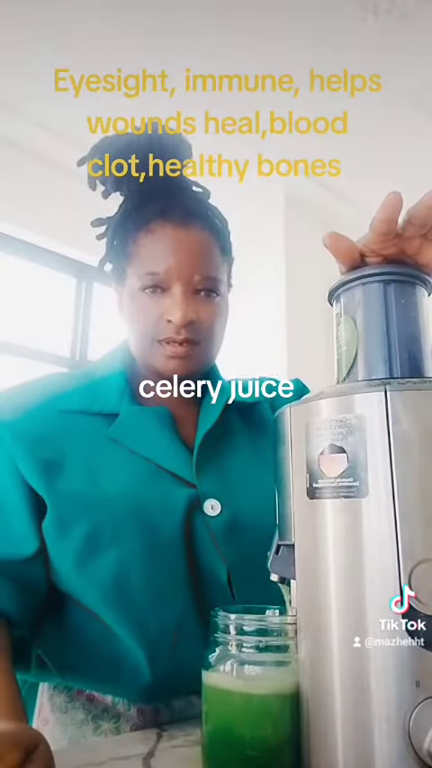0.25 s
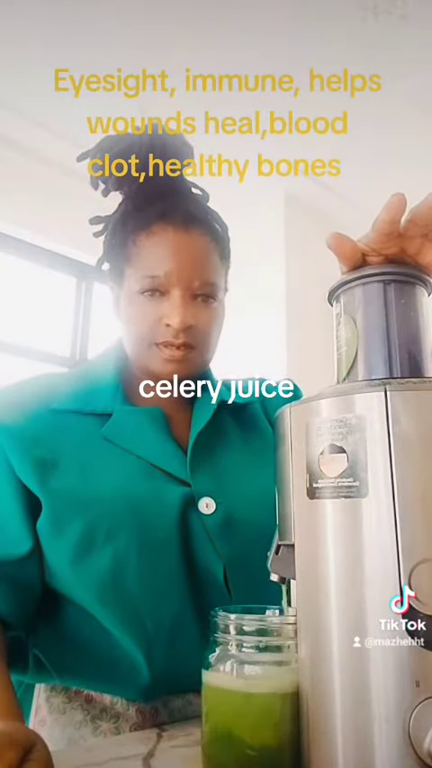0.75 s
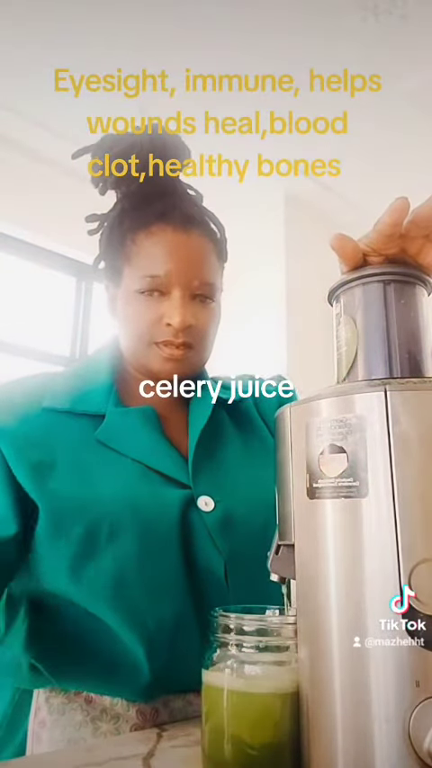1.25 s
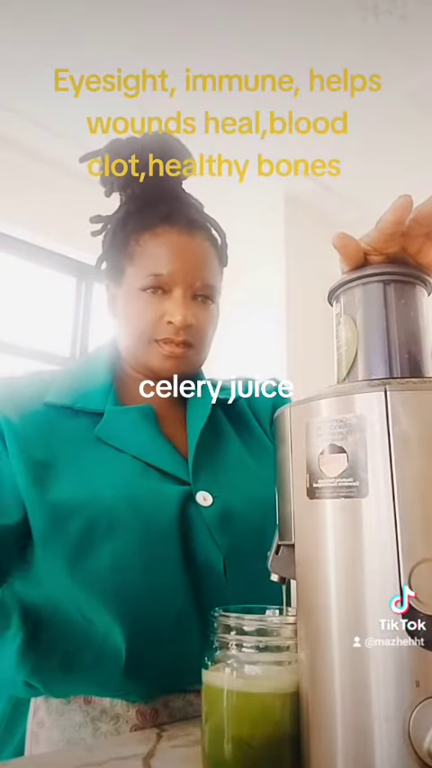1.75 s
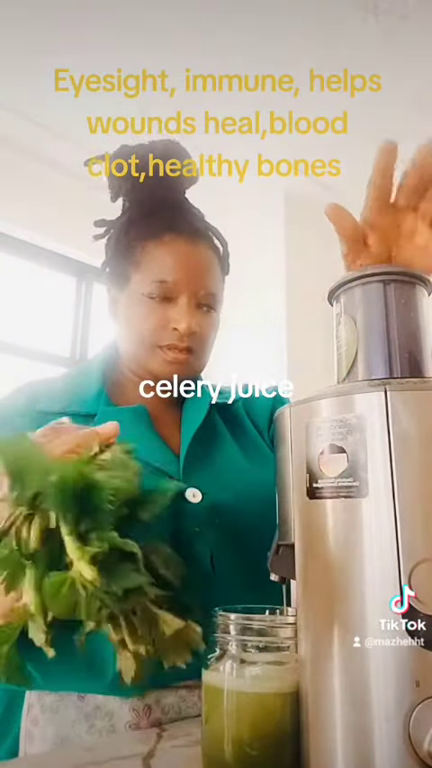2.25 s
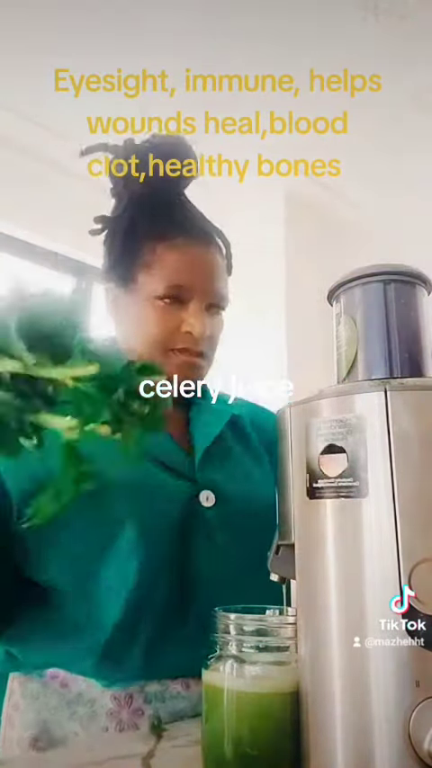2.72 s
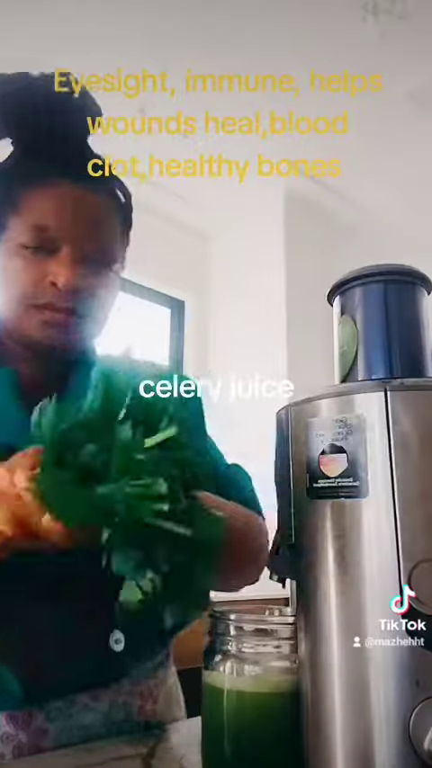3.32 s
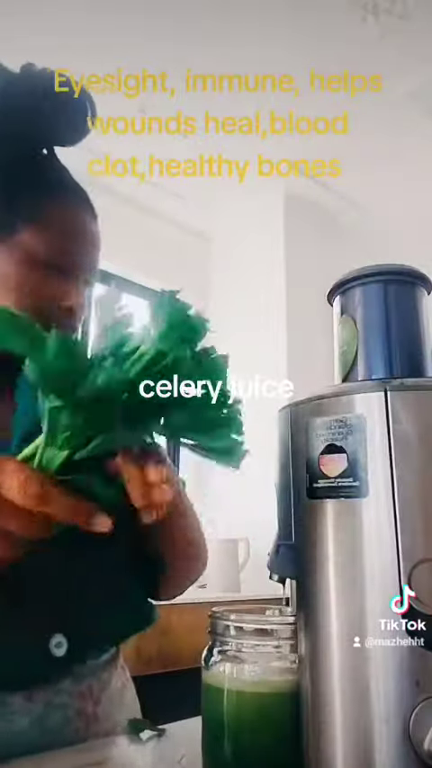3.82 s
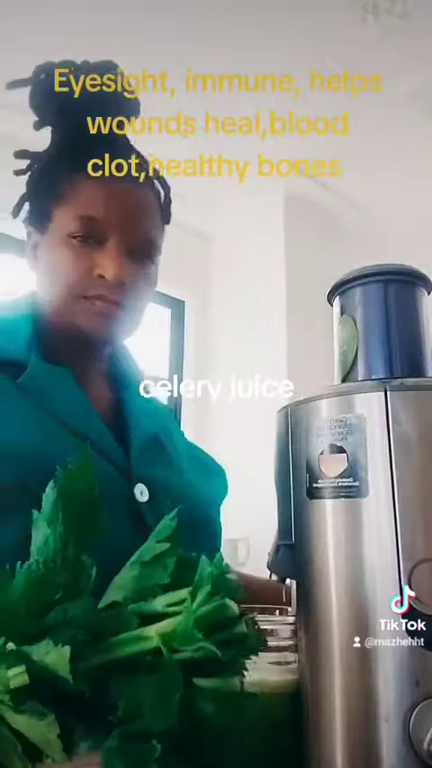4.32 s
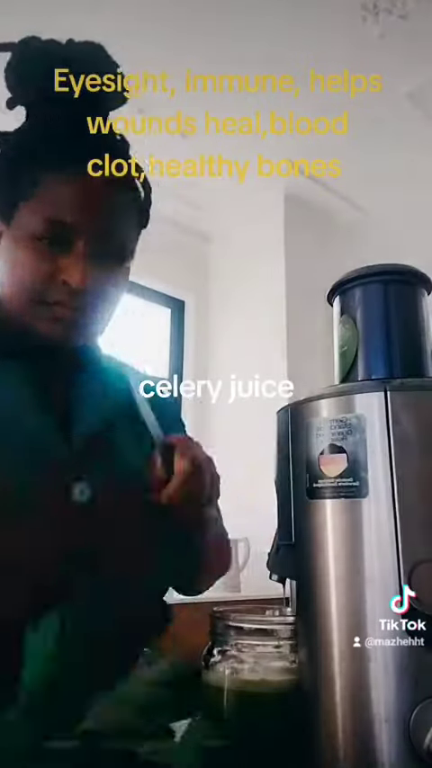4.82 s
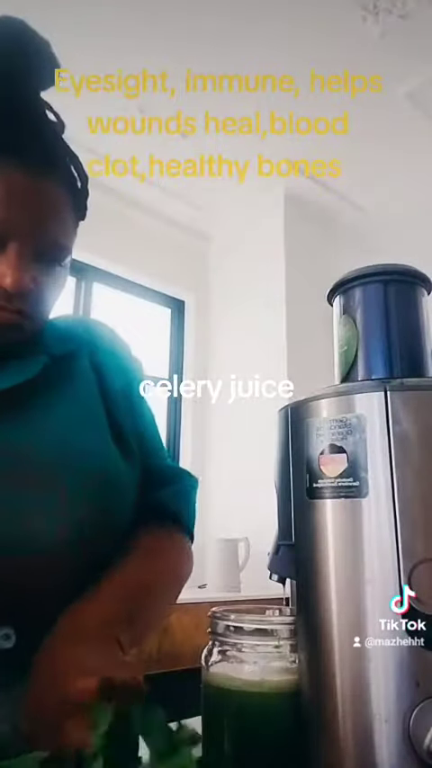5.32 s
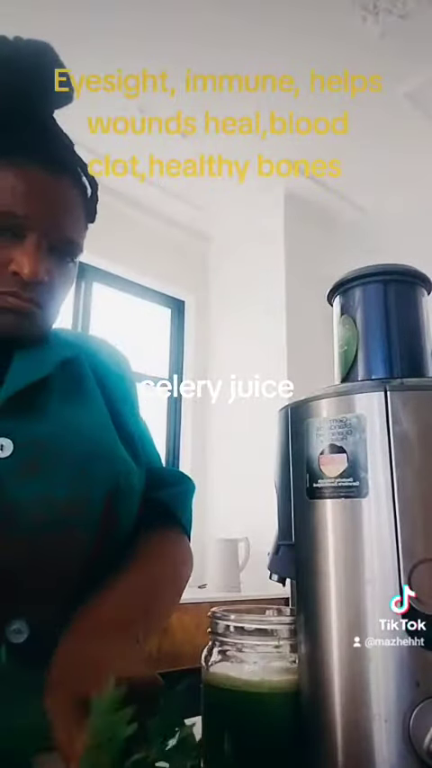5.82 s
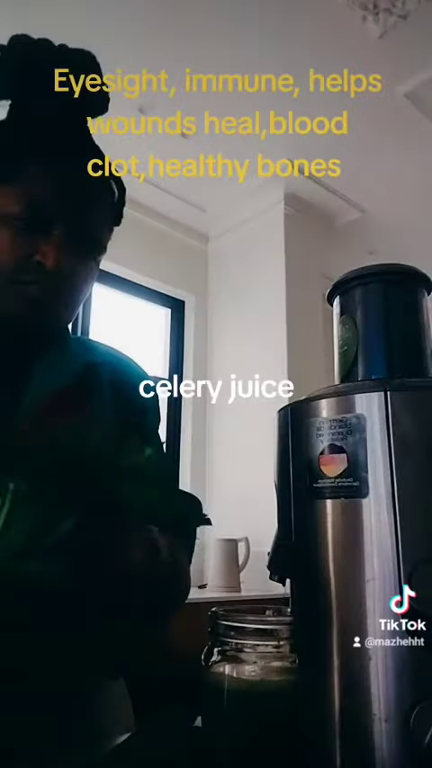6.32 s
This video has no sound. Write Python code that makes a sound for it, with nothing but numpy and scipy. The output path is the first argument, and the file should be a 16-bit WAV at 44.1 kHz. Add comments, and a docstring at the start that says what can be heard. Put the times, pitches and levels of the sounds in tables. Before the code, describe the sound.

A juicer motor drones under load, eases slightly as it runs free, and celery stalks are cut with two crisp crunches.

```python
"""A slow juicer hums in a kitchen: its motor labours on celery, then speeds up a little as the load falls.
Rotor unbalance, mains hum in the iron and meshing gear teeth give steady partials over a whirr of air
and bearings. The pusher chatters once a turn under the hand and bumps as it is let go.
Beside it a leafy bunch rustles, and a knife crunches twice through the stalks by brittle fracture
and knocks on the counter."""
import sys
import numpy as np
from scipy import signal
from scipy.fft import rfft, irfft, next_fast_len
from scipy.io import wavfile
from scipy.ndimage import map_coordinates

SR = 44100
rng = np.random.default_rng(int(sys.argv[2]) if len(sys.argv) > 2 else 0)


def materialize(psi):
    """Save the field psi as 16-bit PCM at rate SR to the path in sys.argv[1].

    A 1-D psi becomes a single channel; in a 2-D psi each row is a channel.
    """
    bounded = np.clip(np.atleast_2d(psi).T, -1, 1)
    quanta = np.round(bounded * 32767).astype(np.int16)
    wavfile.write(sys.argv[1], SR, quanta)


N = 288855
TIME = np.arange(N) / SR
FREE_TURNS_PER_S = 120.93


def juicer():
    """Rotating machinery: one shaft angle times the partials, and the load sets their speed and balance."""
    # the celery runs out: time_s, load (1 pressing, 0 running free)
    load_curve = [(0, 0.96), (1, 0.91), (1.6, 0.82), (2.27, 0.78), (2.32, 0.46), (2.75, 0.39), (2.95, .13),
                  (4.5, 0), (6.55, 0.051)]
    # rotor harmonics from the third up: loaded_db, free_db, loaded_pan_db, free_pan_db
    rotor_levels = [(-51.0, -59.5, 1, -3), (-51, -56.0, 0, -3.0), (-48.0, -58.5, -3.0, 4),
                    (-69.5, -60.5, -3.0, 0), (-60.5, -68.5, 0, 0), (-51.0, -70.5, -0.0, -2),
                    (-66, -69.5, 7, 9), (-59.5, -53.0, -1.5, 11), (-71.5, -79, 6, 0),
                    (-68.0, -60.5, 3, 1.5), (-59, -60.5, 8, 12), (-47.0, -69, 7.0, 13), (-59, -57, 6, 12),
                    (-60.5, -54.5, 6.0, 16.0), (-68, -76, 0, 5.0), (-70, -64.5, 4.0, 7), (-67, -74, 6, 6.0),
                    (-60, -66, 6, 18), (-62, -68, 11, 17)]
    # gear mesh (2.6 a turn), overtones, sidebands: order, loaded_db, free_db, loaded_pan_db, free_pan_db
    gear_partials = [(2.6, -49.0, -61.0, 1.0, -0.0), (2.8, -62.0, -60.0, -3.0, -2.0),
                     (3.6, -73.0, -64.0, -4.0, -3.0), (3.8, -77.0, -65.0, -4.0, -5.0),
                     (4.4, -67.0, -64.0, -2.0, -3.0), (5.2, -56.0, -55.0, 4.0, -2.0),
                     (5.4, -56.0, -65.0, 2.0, 6.0), (8.8, -63.0, -73.0, 2.0, 5.0),
                     (9.4, -69.0, -71.0, 1.0, 1.0), (10.4, -60.0, -66.0, 4.0, 5.0),
                     (18.2, -70.0, -77.0, 8.0, 9.0), (18.6, -72.0, -69.0, 10.0, 13.0),
                     (20.8, -64.0, -67.0, 14.0, 14.0), (23.8, -70.0, -75.0, 13.0, 8.0),
                     (25.4, -67.0, -70.0, 10.0, 11.0), (26.4, -70.0, -68.0, 13.0, 15.0),
                     (27.4, -69.0, -73.0, 10.0, 11.0), (28.2, -71.0, -65.0, 10.0, 19.0),
                     (29.2, -70.0, -72.0, 17.0, 18.0), (29.6, -69.0, -70.0, 16.0, 17.0),
                     (29.8, -55.0, -60.0, 20.0, 21.0), (30.2, -68.0, -77.0, 18.0, 14.0),
                     (30.4, -70.0, -82.0, 18.0, 13.0), (30.6, -68.0, -75.0, 14.0, 15.0),
                     (30.8, -56.0, -65.0, 20.0, 16.0), (31.2, -57.0, -65.0, 19.0, 12.0),
                     (32.8, -73.0, -69.0, 17.0, 21.0), (33.4, -74.0, -66.0, 15.0, 20.0),
                     (34.2, -68.0, -68.0, 17.0, 20.0), (36.4, -66.0, -62.0, 9.0, 18.0),
                     (46.8, -71.0, -77.0, 14.0, 8.0), (49.4, -60.0, -65.0, 19.0, 21.0)]
    load, = in_time(load_curve)
    turn = rotor_angle(load)
    gear_turn = turn * (1 - .00083)  # the gear whine sits a hair below 2.6 times the rotor speed
    harmonics = [(order, *row) for order, row in enumerate(rotor_levels, 3)]
    rotor = whine(harmonics, turn, load, waver_db=1.64, waver_hz=1.95, smear_rad=0.016)
    gears = whine(gear_partials, gear_turn, load, waver_db=1.5, waver_hz=5.4, smear_rad=0.067)
    singing = singing_gears(gear_turn)
    air = whirr(gear_turn, load)
    clearing = swell(centre_s=2.9, width_s=0.58)  # the last pulp clears
    whining = from_db(-0.42 + 3 * clearing) * (rotor + from_db(0.5) * gears)
    air *= from_db(.4 - .6 * load + 2.2 * clearing)
    return hum(turn, load) + whining + singing + air + pusher_chatter(turn)


def rotor_angle(load, sag_turns_per_s=2.2, lag_s=.26):
    """First-order lag: the speed sags a moment after the load, and is never quite even."""
    keep = np.exp(-1 / (lag_s * SR))
    drag = load[0] + signal.lfilter([1 - keep], [1, -keep], load - load[0])
    speed = FREE_TURNS_PER_S - sag_turns_per_s * drag + 0.0302 * drift(11.1)
    return 2 * np.pi * np.cumsum(speed) / SR


def hum(turn, load, mains_hum_hz=100.25):
    """Forced vibration: unbalance shakes the housing, and the mains field shakes the motor's iron."""
    # hum at twice the rotor speed: time_s, level_db
    drone = [(0.06, -34), (1.63, -34.5), (2.44, -34), (2.63, -41.5), (2.99, -30), (3.3, -29), (4.76, -29),
             (5.49, -31.5), (6.48, -31.5)]
    # harmonics of the mains hum: multiple, loaded_db, free_db
    mains = [(1, -45, -55), (2, -57, -54.5), (4, -61.5, -61.5)]
    let_go = swell(centre_s=2.405, width_s=0.055)
    shake_db = -43 + 4.5 * load - 9 * let_go + .5 * drift(15.0)
    out = tone(turn, shake_db, pan_db=-2.0, lead_rad=0.049)
    out += tone(2 * turn, in_time(drone)[0], pan_db=-1.8, lead_rad=0.24)
    for multiple, loaded_db, free_db in mains:
        level_db = free_db + load * (loaded_db - free_db) + 2.6 * drift(10.5)
        out += tone(2 * np.pi * multiple * mains_hum_hz * TIME, level_db, pan_db=2.0, lead_rad=.1)
    return out


def whine(partials, turn, load, waver_db, waver_hz, smear_rad):
    """Periodic forcing: partials lie at fixed orders (multiples) of the shaft speed, weighted by load."""
    # three harmonics swell and fade: time_s, fifth_db, tenth_db, sixteenth_db
    swells = [(0.04, 3, 5, -5), (0.19, 2.5, 6, 1), (0.55, 3, 5.5, 2), (0.88, 3.5, 4, -8),
              (1.12, 0.5, 3, 10), (1.3, 0, 5, 2), (1.51, 0.5, 5, 4.5), (1.72, 1, 6, 4), (1.9, -0.5, 1, 3.5),
              (2.23, -2.5, 3, 5), (2.32, -2.5, 3, 1), (2.41, -6.0, -2, 0), (2.56, -11.5, -1, -3),
              (2.68, -16, 3, -1), (2.8, -4, -1, -1), (2.89, -1, 2, 4), (3.1, 1, 1.5, -1.5),
              (3.43, 1.5, -1.5, 3.5), (3.7, 3, -3, 3.5), (4.48, 2.5, 2, 3), (5.02, 1.5, 2.5, 3.5),
              (5.45, 2, 1, -2.5), (5.6, 1, 0, -1.5), (6.47, 1, 1.5, 0.5)]
    # standing waves between housing and walls: order, left_lead_rad
    leads = [(3, 0.64), (6, 0), (8, -1.5), (10, 1.5), (12, 1.77), (14, 3.5), (16, 1.15), (20, 2.5),
             (36, 0.44)]
    swell_db = dict(zip((5, 10, 16), in_time(swells)))
    out = np.zeros((2, N))
    for order, loaded_db, free_db, loaded_pan_db, free_pan_db in partials:
        change_db = swell_db.get(order, waver_db * drift(waver_hz))
        level_db = free_db + load * (loaded_db - free_db) + change_db
        pan_db = free_pan_db + load * (loaded_pan_db - free_pan_db)
        lead_rad = np.interp(order, *np.transpose(leads))
        out += tone(order * turn + smear_rad * drift(waver_hz), level_db, pan_db, lead_rad)
    return out


def singing_gears(turn):
    """Resonance: the housing lifts three mesh overtones, and the output shaft modulates their level."""
    # the loudest mesh overtones: overtone, pan_db
    overtones = [(9, 15), (11, 17.5), (13, 29)]
    # their separate swells: time_s, first_db, second_db, third_db
    levels = [(0.04, -49, -52, -54), (0.34, -51.5, -48.5, -54), (1.03, -57.5, -50.5, -53.0),
              (1.33, -50, -48.5, -57), (1.84, -63, -48.5, -53), (2.05, -55, -48.5, -52),
              (2.32, -50.5, -46.5, -52), (2.56, -51, -52, -53), (2.68, -52.5, -45, -53),
              (2.83, -49, -48, -51.5), (3.1, -53, -45, -51), (3.34, -55, -47.5, -54), (3.43, -55, -50, -69),
              (3.7, -57.5, -50.5, -54), (3.91, -51, -49.0, -58.0), (4.06, -55.0, -57.5, -56.0),
              (4.39, -58, -52, -59), (4.63, -52.5, -54, -73), (4.84, -58, -47.0, -56),
              (4.99, -53, -50, -61), (5.2, -57.0, -51, -57), (5.45, -54, -51.5, -54),
              (5.69, -55, -50.5, -54), (5.96, -53.5, -48, -54.5), (6.08, -52.5, -54, -54.5),
              (6.47, -52, -52.5, -58)]
    mesh, shaft = turn * 13 / 5, turn / 5
    out = np.zeros((2, N))
    for (overtone, pan_db), level_db in zip(overtones, in_time(levels)):
        wobble_db = 0.54 * np.sin(shaft + rng.uniform(0, 2 * np.pi)) + 1.5 * drift(6.3)
        out += tone(overtone * mesh + 0.048 * drift(9.5), level_db + wobble_db, pan_db, lead_rad=1.49)
    return out


def whirr(turn, load, throb_depth=0.093, right_lag_s=0.00015):
    """Modulated broadband noise: air and bearings throb with the rotation; the load shifts their colour."""
    # colour of the whirr as heard through a microphone notched near 8 kHz:
    # frequency_hz, loaded_density_db, free_density_db, pan_db
    spectrum = [(25.2, -88, -100, -5), (60, -80, -87.5, -22), (122, -76.5, -74.5, -12),
                (218, -63, -71.5, -11), (430, -80.5, -79, 2), (540, -79, -81.5, -23),
                (1024, -84.5, -86.5, 11), (2310, -83.5, -87, 1.5), (3860, -84.5, -89.5, 17),
                (4570, -88.5, -91, 15), (5250, -87, -92, 15.5), (7380, -99, -100, 7.5),
                (8200, -114, -118, 22), (9050, -100, -102, 3.5), (14600, -92.5, -96.5, 12)]
    # likeness of left and right: frequency_hz, coherence
    coherence = [(30, 0.6), (150, 0.2), (400, 0.79), (900, 0.16), (2000, 0.43), (5000, 0.35),
                 (15000, 0.046)]
    mid, side = tooth_noise(turn) * np.sqrt(SR / 2)  # unit power per hertz
    air = coloured(mid, lambda hz: np.sqrt((1 + at_hz(coherence, hz)) / 2))
    air = air + coloured(side, lambda hz: np.sqrt((1 - at_hz(coherence, hz)) / 2)) * [[1], [-1]]
    throb = np.cos(3 * turn) + 2.1 * np.cos(2 * turn) + .5 * np.cos(turn)
    air *= (1 + throb_depth * throb) * from_db(1.08 * drift(22))
    delays_s = np.array([[0], [right_lag_s]])
    place = lambda hz: sides(at_hz(spectrum, hz, column=3)) * np.exp(-2j * np.pi * hz * delays_s)
    loaded = coloured(air, lambda hz: from_db(at_hz(spectrum, hz, column=1)) * place(hz))
    free = coloured(air, lambda hz: from_db(at_hz(spectrum, hz, column=2)) * place(hz))
    return load * loaded + (1 - load) * free


def tooth_noise(turn, worn_share=.35):
    """Periodic roughness: worn teeth repeat a share of two noises with the output shaft, every five turns."""
    size = round(5 * SR / FREE_TURNS_PER_S)
    position = turn / (10 * np.pi) % 1 * size
    worn = [map_coordinates(rng.standard_normal(size), [position], mode="grid-wrap") for _ in range(2)]
    return np.sqrt(worn_share) * np.array(worn) + np.sqrt(1 - worn_share) * rng.standard_normal((2, N))


def pusher_chatter(turn, waver_hz=4.2, rasp_from_order=38):
    """Periodic contact: the pusher chatters once a turn; its top harmonics, nearly in phase, rasp."""
    # chatter harmonics: order, pusher_high_db, pusher_low_db, free_db, pan_db
    harmonics = [(22.0, -58.5, -62.5, -74, 5.0), (23.0, -58.5, -58, -64.5, 13),
                 (24.0, -69, -53.0, -75, 7.0), (25.0, -62, -54, -78, 14), (26.0, -57.0, -55.5, -68.5, 7),
                 (27.0, -63.0, -59, -76, 10.0), (28.0, -66.0, -60, -65.5, 20), (29.0, -60, -51, -73, 17.0),
                 (30.0, -62, -62, -70.0, 16), (31.0, -53, -57.5, -66, 18), (32.0, -52.5, -56, -72, 23),
                 (33.0, -70, -57, -70, 12), (34.0, -57.5, -64.0, -67, 9), (35.0, -66, -63.0, -77, 6),
                 (36.0, -56, -61, -78, 10.0), (37.0, -65, -70, -79, 11), (38.0, -74, -63.0, -80, 14),
                 (39.0, -59.5, -69, -80, 14), (40.0, -59, -66, -78, 14.0), (41.0, -66, -71, -78.0, 17),
                 (42.0, -57, -73, -79, 17.0), (43.0, -57.5, -70, -82.0, 18), (44.0, -74, -82, -75.0, 16),
                 (45.0, -62.5, -59, -87, 17.0), (46.0, -65, -74, -85, 17), (47.0, -68, -64.0, -89.0, 13),
                 (48.0, -62, -82.0, -85.0, 17.0), (49.0, -70.0, -76, -69.5, 15)]
    # the pusher sinks, then is let go: time_s, depth (0 to 1), pressure (1 is a firm push)
    press = [(0, 0.03, 0.95), (.5, 0, 1.08), (.7, 0.3, 1.22), (1, 0, 1.02), (1.2, 0.2, 0.88),
             (1.6, 0.8, 1.03), (1.9, 1, 0.98), (2.05, .95, 0.96), (2.18, 0.9, 0.92), (2.285, 0.5, 1),
             (2.31, 1, 0.57), (3.3, 1, 0.33)]
    # the rasp flares just before the hand lifts: time_s, gain_db
    rasp = [(0, 2), (.3, -0.5), (.5, 2), (.9, -0.5), (1.2, 0.5), (1.8, 0.5), (2.2, 5.5), (2.27, 7),
            (2.3, 2), (2.34, 1), (2.6, -1)]
    depth, pressure = in_time(press)
    rasp_db, = in_time(rasp)
    out = np.zeros((2, N))
    for order, high_db, low_db, free_db, pan_db in harmonics:
        pressed_db = high_db + depth * (low_db - high_db)
        level_db = free_db + pressure * (pressed_db - free_db) + 2.45 * drift(waver_hz) - 0.13
        scatter_rad = np.pi
        if order >= rasp_from_order:
            level_db += rasp_db
            scatter_rad = 0.99
        if order == 23:  # grows near the end, beating with the gear overtone beside it
            level_db += 3.5 * swell(centre_s=6, width_s=0.76)
        angle = order * turn + 0.06 * drift(waver_hz)
        out += tone(angle, level_db, pan_db, lead_rad=2.03, scatter_rad=scatter_rad)
    return out


def pusher_bumps():
    """Impact excitation: the pusher shifts as the hand lets go, and rings with the chute."""
    # shifts of the pusher: start_s, level_db
    bumps = [(2.255, -53), (2.295, -36), (2.335, -35.5)]
    # pusher and chute modes: pitch_hz, gain_db, t60_s
    modes = [(359, -0.5, 0.21), (396, -6, 0.11), (1180, -21, 0.04)]
    return struck_body(bumps, modes, contact_hz=2000, pan_db=1)


def cutting(cracks_per_s=4400, spread_db=4.0, snap_s=0.0035, body_hz=3100, treble_hz=7400):
    """Brittle fracture: countless cells crack under the blade, and tough fibres snap singly."""
    # leaves and stalks giving way: start_s, length_s, level_db
    crunches = [(1.62, .012, -42), (2.84, 0.032, -49), (2.905, .008, -48), (3.26, 0.014, -43),
                (4.877, 0.023, -39), (5.288, 0.069, -39.5), (5.358, 0.031, -31.5), (5.55, 0.073, -41),
                (5.636, 0.1, -38), (5.853, .02, -46)]
    # the toughest fibres: start_s, treble_db, middle_db, body_db
    fibres = [(5.293, -35, -41, -40), (5.34, -32, -37, -32), (5.3603, -29, -33, -29.5),
              (5.3735, -33, -39, -40), (5.381, -34, -37, -35), (5.388, -26.5, -29.5, -31),
              (5.396, -33, -34, -35), (5.5495, -44, -42, -46), (5.592, -42, -44, -43),
              (5.637, -33, -28.5, -34), (5.65, -29, -33.5, -35), (5.6605, -27, -39, -41),
              (5.6935, -35, -35, -32), (5.708, -27, -31, -37), (5.7145, -33, -36, -38),
              (5.7238, -35, -42, -42), (5.741, -25, -35, -43), (5.7572, -34, -37, -42),
              (5.792, -42, -46, -52)]
    # the crunch's colour as heard through a microphone notched near 8 kHz: frequency_hz, gain_db
    spectrum = [(300, -11), (800, -8.5), (2000, -5.5), (3000, -4.5), (4000, -2), (5200, -3), (6200, -11.5),
                (7200, -19), (8200, -32), (9200, -22.5), (10400, -18), (12000, -9), (13800, -4.5),
                (15500, -4)]
    sizes = from_db(spread_db * np.minimum(rng.exponential(1, N), 4)) * rng.choice([-1, 1], N)
    cracks = sizes * (rng.random(N) < cracks_per_s / SR)
    cracks *= strokes(crunches, rise_db_per_s=1097, fall_db_per_s=518) / cracks.std()
    treble, middle, body = np.zeros((3, N))
    age = TIME[:SR // 40]
    for start_s, treble_db, middle_db, body_db in fibres:
        burst = rng.standard_normal(len(age)) * np.exp(-age / snap_s)
        span = slice(round(start_s * SR), round(start_s * SR) + len(age))
        treble[span] += burst * from_db(treble_db + 5.5)
        middle[span] += burst * from_db(middle_db + 9)
        body[span] += burst * from_db(body_db + 10)
    below = lambda hz, edge_hz: 1 / (1 + (hz / edge_hz) ** 6)
    snaps = coloured(treble, lambda hz: 1 - below(hz, treble_hz))
    snaps += coloured(middle, lambda hz: below(hz, treble_hz) - below(hz, body_hz))
    snaps += coloured(body, lambda hz: below(hz, body_hz))
    crunch = coloured(cracks + snaps, lambda hz: from_db(at_hz(spectrum, hz)))
    return kitchen(crunch, t60_s=0.33, wet_db=-15) * sides(pan_db=14)


def counter_knocks():
    """Impact excitation: the knife reaches the counter and sounds its low modes."""
    # blows of the knife: start_s, level_db
    blows = [(5.365, -58), (5.395, -51), (5.645, -58)]
    # counter modes: pitch_hz, gain_db, t60_s
    modes = [(58, 4, 0.24), (89, 19, 0.11), (149, -3, 0.083)]
    return struck_body(blows, modes, contact_hz=130, pan_db=-7)


def leaves(rubs_per_s=1800):
    """Friction noise: dense small rubs in the lifted bunch merge into a rustle, blurred by the room."""
    # the rustle's colour as heard through a microphone notched near 8 kHz: frequency_hz, gain_db
    spectrum = [(100, -17), (500, -9), (1200, -2), (1800, 6.5), (2500, -10.5), (4200, -1), (6000, -16),
                (8200, -28), (11000, -30), (15000, -13)]
    # the bunch being lifted: start_s, length_s, level_db
    lifts = [(2.45, .02, -58), (2.825, 0.1, -49)]
    rubs = rng.standard_normal(N) * (rng.random(N) < rubs_per_s / SR)
    rustle = kitchen(coloured(rubs, lambda hz: from_db(at_hz(spectrum, hz))), t60_s=0.21, wet_db=-4.0)
    return rustle / rustle.std() * strokes(lifts, rise_db_per_s=80, fall_db_per_s=54) * sides(pan_db=9)


def struck_body(blows, modes, contact_hz, pan_db):
    """Modal ringing: each blow starts damped sines, and the soft contact weakens the high ones."""
    out = np.zeros(N)
    for start_s, level_db in blows:
        age = TIME[:N - round(start_s * SR)]
        for pitch_hz, gain_db, t60_s in modes:
            decay = from_db(level_db + gain_db - 60 * age / t60_s)
            out[-len(age):] += decay * np.sin(2 * np.pi * pitch_hz * age)
    contact = signal.butter(2, [42, contact_hz], "band", fs=SR, output="sos")
    return signal.sosfilt(contact, out) * sides(pan_db)


def kitchen(x, t60_s, wet_db):
    """Reverberation: a diffuse tail, different on each side, follows the direct sound."""
    age = TIME[:SR // 2]
    tail = rng.standard_normal((2, len(age))) * from_db(-60 * age / t60_s)
    tail /= np.sqrt(np.sum(tail ** 2, axis=1, keepdims=True))
    return x + from_db(wet_db) * signal.fftconvolve(x[None], tail, axes=1)[:, :N]


def tone(angle, level_db, pan_db, lead_rad, scatter_rad=np.pi):
    """A sine of given rms level and random starting phase; the left side leads by lead_rad."""
    phase = angle + scatter_rad * rng.uniform(-1.014, 1)
    return np.sqrt(2) * from_db(level_db) * sides(pan_db) * np.sin([phase + lead_rad, phase])


def sides(pan_db):
    """Constant-power panning: two gains, the left pan_db above the right."""
    ratio = from_db(np.atleast_1d(pan_db))
    return np.array([ratio, np.ones_like(ratio)]) * np.sqrt(2 / (1 + ratio ** 2))


def drift(corner_hz):
    """Low-passed noise: a slow random wander of unit spread."""
    hop, settling = 100, 1000
    pole = np.exp(-2 * np.pi * corner_hz * hop / SR)
    noise = rng.standard_normal(N // hop + settling + 2)
    slow = signal.lfilter([1], [1, -2 * pole, pole * pole], noise)[settling:]
    return np.interp(np.arange(N) / hop, np.arange(len(slow)), slow / slow.std())


def swell(centre_s, width_s):
    """A Gaussian rise to 1 and fall back to 0."""
    return np.exp(-((TIME - centre_s) / width_s) ** 2)


def strokes(rows, rise_db_per_s, fall_db_per_s):
    """Exponential envelopes: each stroke rises, holds for its length and dies away."""
    out = np.zeros(N)
    for start_s, length_s, level_db in rows:
        below_db = rise_db_per_s * np.maximum(start_s - TIME, 0)
        below_db += fall_db_per_s * np.maximum(TIME - start_s - length_s, 0)
        out = np.maximum(out, from_db(level_db - np.minimum(below_db, 100)))
    return out


def coloured(x, gain_at):
    """Linear filtering by a gain given as a function of frequency."""
    size = next_fast_len(N + 4096, real=True)
    hz = np.fft.rfftfreq(size, 1 / SR).clip(1)
    return irfft(rfft(x, size) * gain_at(hz), size)[..., :N]


def at_hz(spectrum, hz, column=1):
    """One column of a spectrum, interpolated on a log-frequency axis."""
    points = np.array(spectrum, float)
    return np.interp(np.log(hz), np.log(points[:, 0]), points[:, column])


def in_time(rows):
    """Each column of a curve, interpolated at every sample."""
    time_s, *columns = np.transpose(rows)
    return [np.interp(TIME, time_s, column) for column in columns]


def from_db(db):
    """Decibels to amplitude gain."""
    return 10 ** (np.asarray(db) / 20)


def scene():
    """Superposition of the juicer and the knife work beside it."""
    return juicer() + pusher_bumps() + cutting() + counter_knocks() + leaves()


def record(dry):
    """Band limiting: a steep low-pass removes the highest treble."""
    cutoff_hz = 15950
    return signal.sosfilt(signal.ellip(12, .1, 90, cutoff_hz, fs=SR, output="sos"), dry)


dry = scene()
out = record(dry)
materialize(out)
```